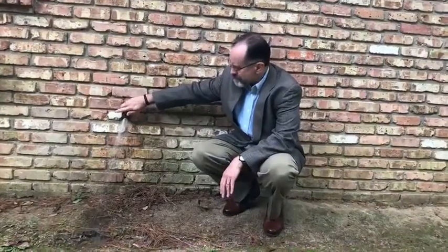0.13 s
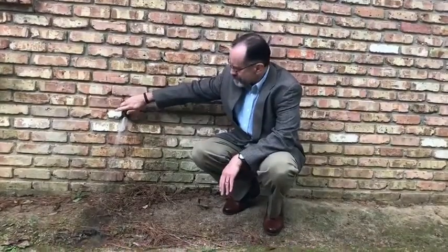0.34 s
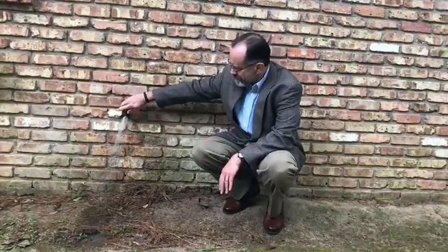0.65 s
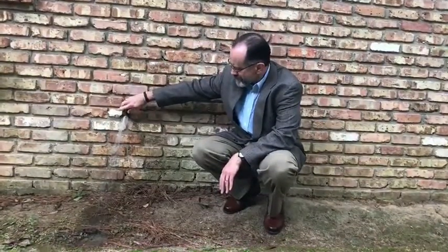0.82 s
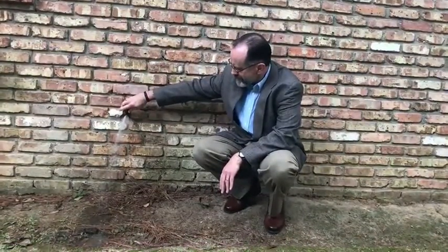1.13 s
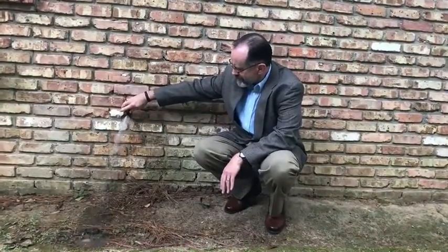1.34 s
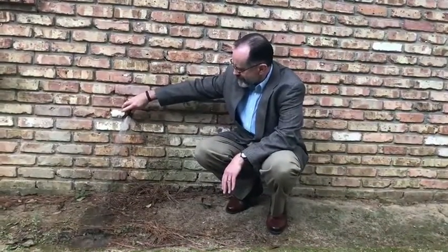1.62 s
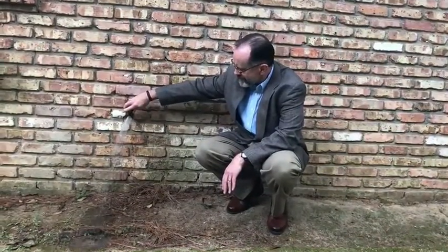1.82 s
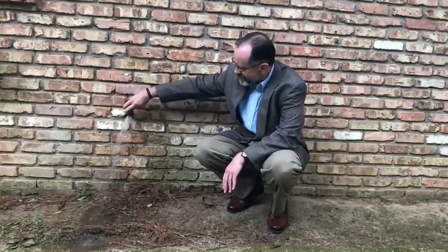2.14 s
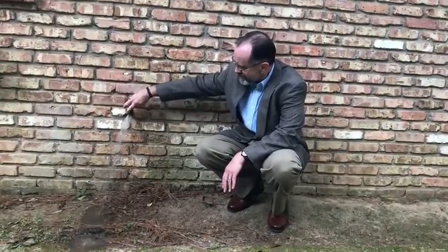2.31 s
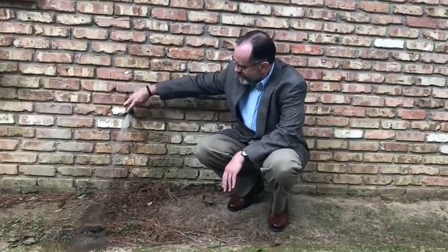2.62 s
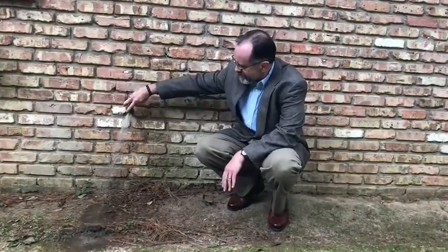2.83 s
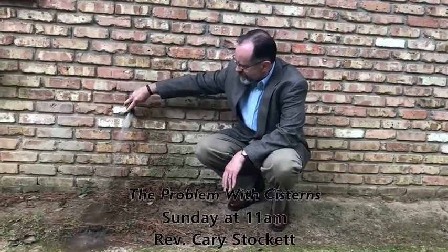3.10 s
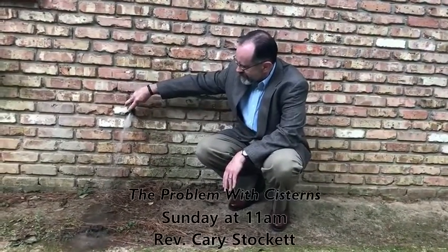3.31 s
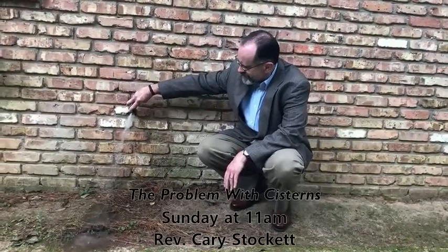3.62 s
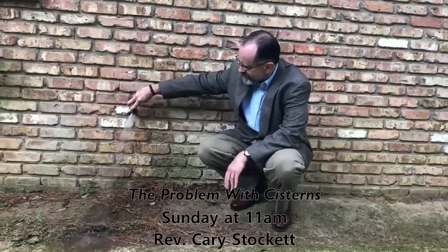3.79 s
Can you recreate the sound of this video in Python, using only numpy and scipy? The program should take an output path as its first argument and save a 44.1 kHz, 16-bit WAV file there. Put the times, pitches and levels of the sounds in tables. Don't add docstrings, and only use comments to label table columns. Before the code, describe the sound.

A close, bright hiss of water spraying from an outdoor tap continues throughout, with metallic ringing, irregular sputters and crisp droplet snaps, above a faint air-conditioner hum and far-off rumble.

```python
import sys
import numpy as np
from scipy import signal
from scipy.fft import rfft, irfft, next_fast_len
from scipy.io import wavfile
from scipy.ndimage import uniform_filter1d, map_coordinates

SR = 44100
rng = np.random.default_rng(int(sys.argv[2]) if len(sys.argv) > 2 else 0)


def dump_mix(stems):
    frames = np.atleast_2d(stems).T
    limited = np.clip(frames, -1, 1)
    pcm = np.round(limited * 32767).astype(np.int16)
    wavfile.write(sys.argv[1], SR, pcm)


def gain_from_db(level_db):
    decades = np.asarray(level_db, float) / 20
    return 10 ** decades


N = 174195
T = np.arange(N) / SR


def unit(x):
    return x / np.sqrt(np.mean(x ** 2) + 1e-20)


def curves(rows):
    s, *columns = np.transpose(rows)
    return [np.interp(T, s, column) for column in columns]


def bumps(rows):
    return sum(db * np.exp(-((T - s) / width) ** 2) for s, db, width in rows)


def wobble(rate):
    return map_coordinates(rng.standard_normal(int(N * rate / SR) + 4), [T * rate])


def filtered(x, response):
    m = next_fast_len(N + 8192)
    return irfft(rfft(x, m) * response(np.fft.rfftfreq(m, 1 / SR)), m)[:N]


def colour(points):
    f, db = np.transpose(points)
    return lambda hz: gain_from_db(np.interp(np.log(hz + 1), np.log(f + 1), db, left=-80))


def modes(peaks):
    def response(f):
        total = 0
        for k, (centre, width, db) in enumerate(peaks):
            total = total + (-1) ** k * gain_from_db(db) * 1j * f * width / (centre * centre - f * f + 1j * f * width)
        return total
    return response


def turbulence(patchy_db, spit_db):
    z = signal.stft(rng.standard_normal(N + 512), nperseg=256)[2]
    field = uniform_filter1d(rng.standard_normal(z.shape), size=8, axis=0)
    field = uniform_filter1d(field, size=6, axis=1)
    noise = signal.istft(z * gain_from_db(patchy_db * unit(field)), nperseg=256)[1][:N]
    return noise * gain_from_db(spit_db * wobble(200))


def ticks(s, gain, hz, cycles):
    k = np.arange(64)
    u = k / SR * hz[:, None] / cycles[:, None]
    envelope = np.e * 2 * u * np.exp(-2 * u - u ** 4)
    wave = gain[:, None] * envelope * np.sin(2 * np.pi * hz[:, None] * k / SR)
    at = np.round(s * SR).astype(int)[:, None] + k
    return np.bincount(at.ravel(), wave.ravel(), N + SR)[:N]


def scattered(x):
    tail_db, t60_s = -5, .02
    t = np.arange(1000) / SR
    tail = rng.standard_normal(len(t)) * gain_from_db(-60 * t / t60_s)
    return x + gain_from_db(tail_db) * signal.fftconvolve(x, tail / np.linalg.norm(tail))[:N]


def splashes():
    splashes_per_s, decay_s, splash_gain = 160, 0.004, 0.25
    landing_gain, landing_db = 3, -6
    draw = rng.random((int(splashes_per_s * N / SR), 2))
    hits = np.bincount((draw[:, 0] * N).astype(int), -np.log(1 - .93 * draw[:, 1]), N)
    s, db, _ = np.transpose([*DROPS, *POPS])
    landing = ((s + DROP_RISE_S) * SR).astype(int)
    hits = hits + np.bincount(landing, landing_gain * gain_from_db(db - landing_db), N)
    return 1 + splash_gain * signal.fftconvolve(hits, np.exp(-T[:2000] / decay_s))[:N]


# pitch_hz, width_hz, level_db
SPOUT = [(2027, 210, -12), (2204, 82, -6), (2537, 140, -6), (2870, 41, -6.5), (3068, 124, -4.5),
         (3211, 54, 1.6), (3380, 54, -1), (3503, 56, -5.5), (3906, 124, -6.5), (4614, 140, -8.5),
         (4886, 99, -7)]


def spout_ring(ring_db, sputter_db):
    ring = unit(filtered(turbulence(patchy_db=0.5, spit_db=1.8), modes(SPOUT)))
    return ring * gain_from_db(-3 + ring_db + 0.55 * sputter_db + 0.72 * wobble(18))


# pitch_hz, level_db per Hz
GUSH = [(500, -28), (1200, -11), (2200, -3), (3500, -2), (5500, 3), (8000, -20)]


def gush(clumps, ring_db, sputter_db):
    rush = unit(filtered(clumps * turbulence(patchy_db=2.5, spit_db=4.5), colour(GUSH)))
    return rush * gain_from_db(-11.5 + ring_db + 1.56 * sputter_db)


# pitch_hz, width_hz, level_db
NOZZLE = [(5250, 220, -3.5), (5580, 286, -3.5), (6238, 200, 0), (6620, 380, -5), (7220, 430, -5.5),
          (7710, 230, -4.5), (8330, 250, -11), (10290, 890, -10.5)]


def nozzle_ring(clumps, shrill_db):
    eddies = turbulence(patchy_db=1.2, spit_db=1.08) * clumps ** 0.28
    return unit(filtered(eddies, modes(NOZZLE))) * gain_from_db(-1 + shrill_db)


# pitch_hz, level_db per Hz
SPRAY = [(200, -25), (900, -16), (1800, -14), (4000, -13), (8800, -5), (10200, -4.5), (13000, -1),
         (16500, -1.5)]


def spray(clumps):
    return unit(filtered(clumps * turbulence(patchy_db=0.6, spit_db=0.4), colour(SPRAY))) * gain_from_db(-1.5)


# pitch_hz, width_hz, level_db
FIZZ = [(4400, 570, 4), (8600, 620, -3)]


def fizz(ring_db):
    return unit(filtered(turbulence(patchy_db=1, spit_db=2), modes(FIZZ))) * gain_from_db(-17 + ring_db)


def spatter():
    ticks_per_s, scatter_db = 800, 5
    tick_hz, spread, cycles = 11500, .18, 2.2
    draw = rng.random((int(ticks_per_s * N / SR), 4))
    size = gain_from_db(-scatter_db * np.log(1 - .9 * draw[:, 1]))
    hz = np.clip(tick_hz * np.exp(spread * 3.4 * (draw[:, 2] - .5)), 500, 15000)
    patter = ticks(draw[:, 0] * N / SR, size, hz, cycles * (0.51 + draw[:, 3]))
    return scattered(unit(patter) * gain_from_db(-5.5))


# time_s, strength_db, low spout modes over it_db, high modes over it_db
FLOW = [(0, -20, -2, 1.2), (.35, -21, -2, 0.6), (.8, -20, -3, -0.5), (1.1, -20.5, -2, -1.5),
        (1.3, -21, -2, -.5), (1.45, -22.5, 1, 1.6), (1.75, -22.5, 0.1, 0.5), (1.9, -22.5, 1.5, .3),
        (2.2, -22, 1, 0.2), (2.45, -22, -1.1, -0.5), (2.7, -21, -0.6, -0.8), (3.1, -21.5, 0.3, -1.1),
        (3.45, -21, .8, 0.7), (3.7, -22, 2, 0.2), (3.95, -20, -1.8, -1)]
# time_s, swell_db, width_s
SPUTTERS = [(.15, 0.5, .1), (.42, 5, 0.035), (1.4, 1.5, 0.035), (1.5, 6.5, 0.047), (1.73, 3.5, 0.04),
            (2.02, 6.5, 0.044), (2.47, 2.5, 0.031), (2.58, 3.5, 0.064), (2.66, 3, 0.023),
            (2.85, 7.5, 0.026), (3.03, 5.5, 0.019), (3.22, 2.5, 0.02), (3.36, 3, .03), (3.48, 2.5, 0.023),
            (3.55, 2, .025), (3.85, 0.5, .025)]


def tap():
    strength_db, ring_db, shrill_db = curves(FLOW)
    sputter_db = bumps(SPUTTERS)
    clumps = splashes()
    jet_db = strength_db + 0.1 * wobble(6.1) + 0.6 * wobble(30.09)
    water = spout_ring(ring_db, sputter_db) + gush(clumps, ring_db, sputter_db)
    water = water + nozzle_ring(clumps, shrill_db) + spray(clumps) + fizz(ring_db)
    return gain_from_db(jet_db) * (water + spatter())


def tone(hz, level_db, lag_s=0):
    return np.sqrt(2) * gain_from_db(level_db + 0.54 * wobble(3.84)) * np.cos(2 * np.pi * hz * (T - lag_s))


# order, level_db
FAN = [(2, -49), (3, -34.5), (4, -31), (5, -35.5)]
# order, level_db
PUMP = [(1, -26.5), (2, -59), (3, -54), (4, -50.5)]
# time_s, fan_db, compressor_db
HUM = [(0, -0.5, -6), (.5, -5, -1.5), (1, -3, -3), (1.5, 0, -0.8), (2.1, -3, 1), (2.8, -2, 0),
       (3.4, -6, -4.5), (3.95, -2, -3)]
# time_s, low buzz_db, fourth order_db, whine_db, upper whine_db
CASING = [(0, 3, 4.5, -15, -8), (.5, 3, -8, -11, -8), (.62, 2.5, 8, 3, 3), (.9, 3, 10, 3, -9),
          (1.1, 2, 3.5, -15, 4), (1.35, -0.5, 0, -10, 6), (1.5, -4, -3, 0, -9), (2.05, -5, -6, 5, -1),
          (2.5, -6, -5.5, 3, -6), (2.8, -6.5, -11, -4, -7), (3.1, -2, -6, 3.5, -2), (3.65, -7.5, -6, 4, 9),
          (3.8, -5, -9, -7, 3), (3.95, -4, -8, -8, -10)]
# pitch_hz, width_hz, level_db
WHINES = [(303.7, 3.3, -47), (531, 2.6, -55), (776, 4.2, -59)]


def air_conditioner():
    fan_hz, fan_lag_s = 20.44, .0024
    pump_hz, pump_lag_s = 94.21, -.0005
    fan_db, pump_db = curves(HUM)
    casing_db, fourth_db, _, _ = curves(CASING)
    drift_db = {1: pump_db, 2: pump_db, 3: casing_db, 4: fourth_db}
    fan = sum(tone(k * fan_hz, db + fan_db, fan_lag_s) for k, db in FAN)
    pump = sum(tone(k * pump_hz, db + drift_db[k], pump_lag_s) for k, db in PUMP)
    buzz = 0
    for hz, width, db in WHINES:
        rattle = unit(filtered(rng.standard_normal(N), modes([(hz, width, 0)])))
        buzz = buzz + gain_from_db(db + casing_db * (hz < 400)) * rattle
    return fan + pump + buzz


# pitch_hz, level_db per Hz
AIR = [(20, -35), (35, -8), (60, -0.5), (100, 2), (150, -3), (250, -11.5), (900, -16.5), (1600, -18),
       (3000, -78)]


def distant_rumble():
    level_db = -34 + 0.27 * curves(CASING)[0] + 0.32 * wobble(2.5)
    return gain_from_db(level_db) * unit(filtered(turbulence(patchy_db=1.3, spit_db=-1.0), colour(AIR)))


def casing_whine():
    _, _, whine_db, upper_db = curves(CASING)
    return tone(650, -53.5 + whine_db + 1.1 * wobble(7.4)) + tone(713, -58 + upper_db)


# start_s, peak_db, pitch_hz
POPS = [(0.0926, -11, 6300), (0.2532, -8, 6390), (0.3181, -9, 5430), (0.3625, -9, 6300),
        (0.5486, -10, 5480), (0.6009, -10, 3160), (0.7197, -10, 6260), (0.806, -10, 3130),
        (1.0349, -11, 6290), (1.4749, -7, 3110), (1.5288, -5, 3190), (1.7258, -8, 3220), (1.7628, -5, 3130),
        (1.9878, -8, 5430), (1.9993, -7, 3220), (2.0895, -7, 5440), (2.6303, -13, 3200), (2.7291, -8, 3410),
        (2.8189, -8, 3220), (2.8518, -8, 3220), (2.9361, -10, 5300), (3.0125, -6, 3380), (3.0438, -8, 3200),
        (3.2165, -8, 5330), (3.2614, -7, 6320), (3.3584, -6, 3220), (3.4254, -8, 3940), (3.5013, -7, 2550),
        (3.7458, -13, 3220), (3.7837, -11, 3240)]


def pops():
    s, db, hz = np.transpose(POPS)
    return ticks(s + .0013, gain_from_db(db - 2), hz, np.full(len(s), 2.5))


# start_s, peak_db, pitch_hz
DROPS = [(0.2033, -11, 10000), (0.2233, -6, 10000), (0.3178, -7, 10300), (0.364, -5, 10600),
         (0.5346, -5, 11400), (0.6773, -6, 10100), (0.7885, -5, 14100), (0.9122, -9, 13800),
         (0.9342, -7, 12300), (1.1811, -6, 12700), (1.263, -7, 12600), (1.3228, -6, 11000),
         (1.3951, -7, 10200), (1.454, -10, 10900), (1.5378, -9, 10500), (1.6406, -6, 9360),
         (1.6835, -8, 9590), (1.7638, -10, 13100), (1.8192, -10, 12200), (1.8466, -10, 10100),
         (1.899, -5, 11800), (1.9499, -5, 9790), (1.9718, -10, 15000), (2.1469, -9, 10600),
         (2.2422, -5, 13800), (2.316, -6, 12000), (2.4108, -8, 11700), (2.5415, -5, 11800),
         (2.605, -3, 10500), (2.6438, -13, 10500), (2.6598, -9, 10800), (2.7286, -3, 9630),
         (2.9411, -8, 9770), (3.0683, -9, 10500), (3.1212, -6, 11400), (3.1711, -5, 10500),
         (3.212, -9, 10200), (3.2204, -8, 10900), (3.2614, -8, 12800), (3.2988, -4, 14800),
         (3.3264, -7, 11300), (3.3904, -9, 10800), (3.4195, -8, 10200), (3.443, -4, 10300),
         (3.5013, -6, 11100), (3.5408, -8, 10700), (3.6136, -5, 14900), (3.6555, -12, 11000),
         (3.7059, -7, 10200), (3.7368, -9, 10900), (3.7912, -8, 9830), (3.8456, -9, 10100),
         (3.8959, -7, 12400)]
DROP_RISE_S = .0012


def drops():
    s, db, hz = np.transpose(DROPS)
    bursts = ticks(s + DROP_RISE_S, gain_from_db(db + 1.5), hz, np.full(len(s), 2.8))
    return scattered(bursts) / gain_from_db(duck_db())


# time_s, depth_db, width_s
DUCKS = [(.06, 5.5, .037), (.18, 2.5, 0.073), (1.18, 4, 0.025), (1.885, 4.5, 0.03), (1.96, 1.5, 0.026),
         (2.55, 7.5, 0.026), (2.605, 7.5, .037), (3.173, 3, 0.051), (3.61, 5, 0.029), (3.7, 5, 0.028),
         (3.765, 5, 0.047), (3.885, 2, 0.032)]


def duck_db():
    return -bumps(DUCKS)


def scene():
    water = tap() + pops() + drops()
    return (water + air_conditioner() + distant_rumble() + casing_whine())[None]


def top_cut(x):
    return signal.sosfilt(signal.butter(12, 16760, fs=SR, output="sos"), x)


def record(dry):
    ceiling, top_hz = .72, 15730
    x = dry[0] * gain_from_db(duck_db())
    x = x / (1 + np.abs(x / ceiling) ** 6) ** (1 / 6)
    mix = filtered(x, lambda hz: hz < top_hz)[None]
    return top_cut(mix)


dry = scene()
out = record(dry)
dump_mix(out)
```